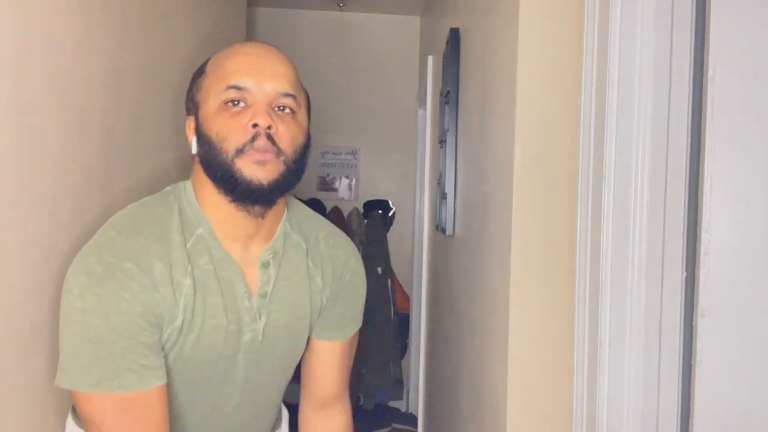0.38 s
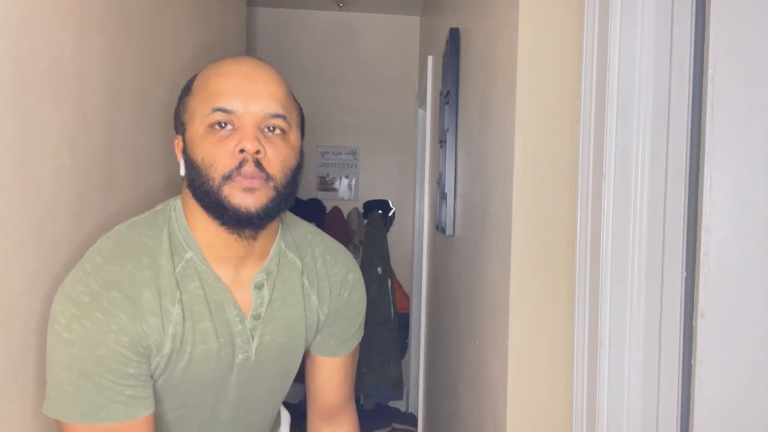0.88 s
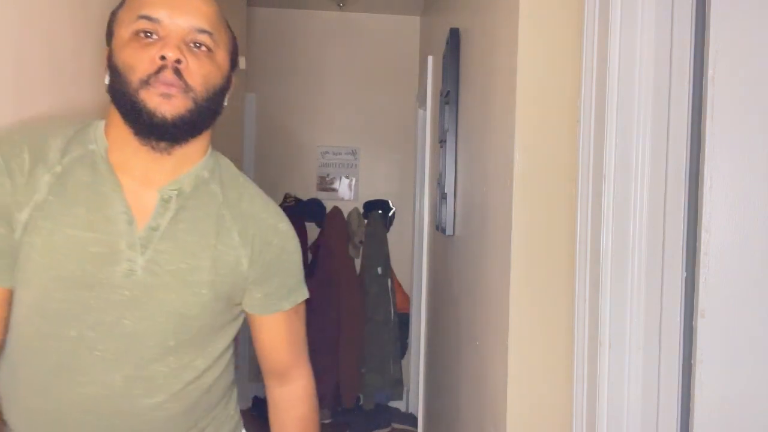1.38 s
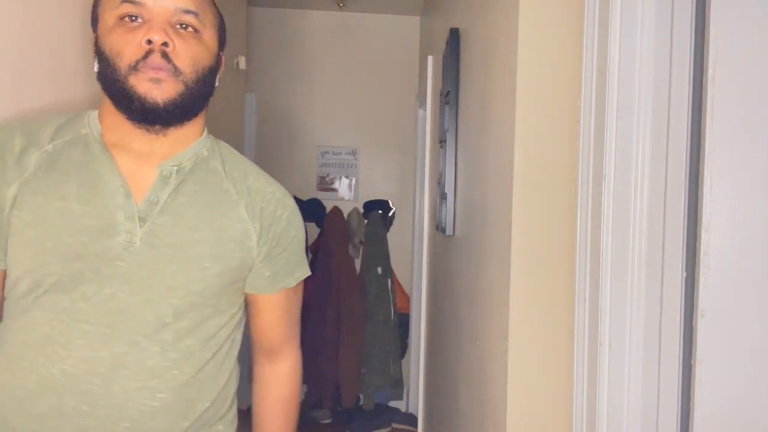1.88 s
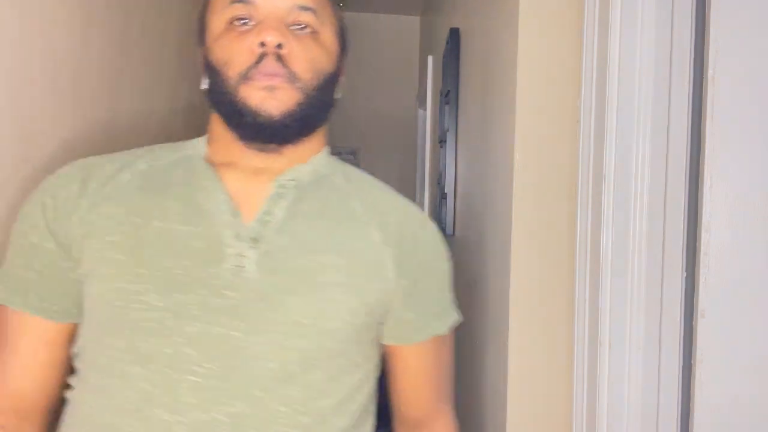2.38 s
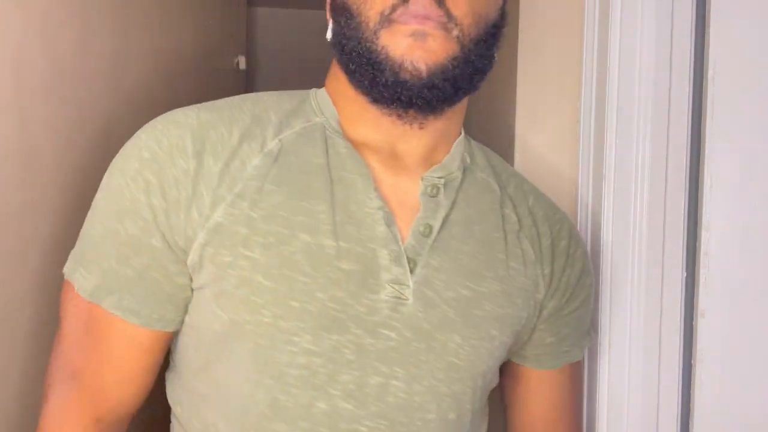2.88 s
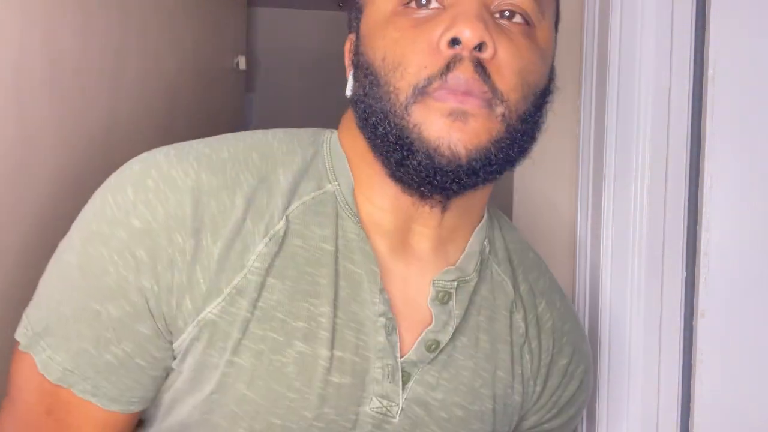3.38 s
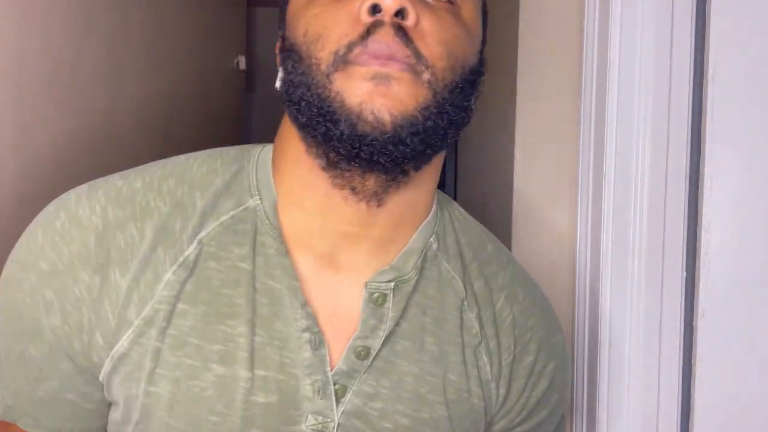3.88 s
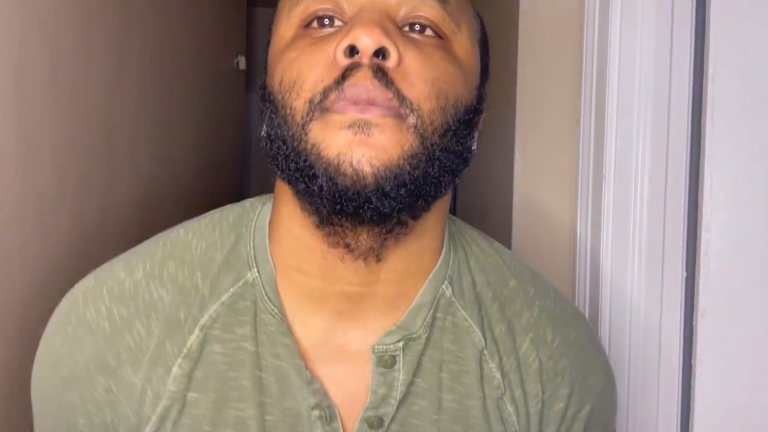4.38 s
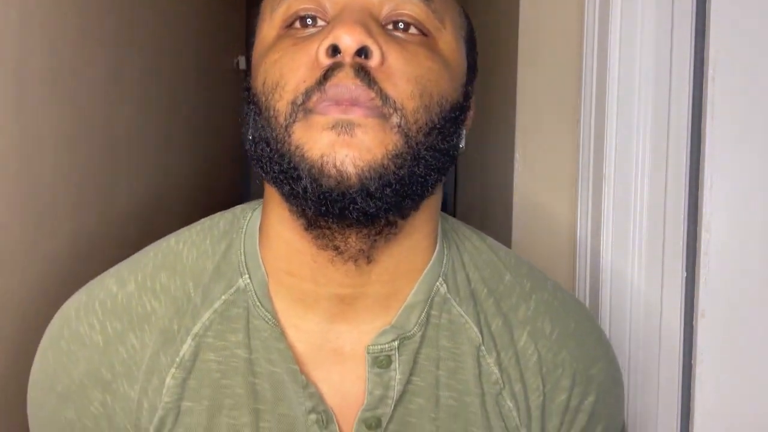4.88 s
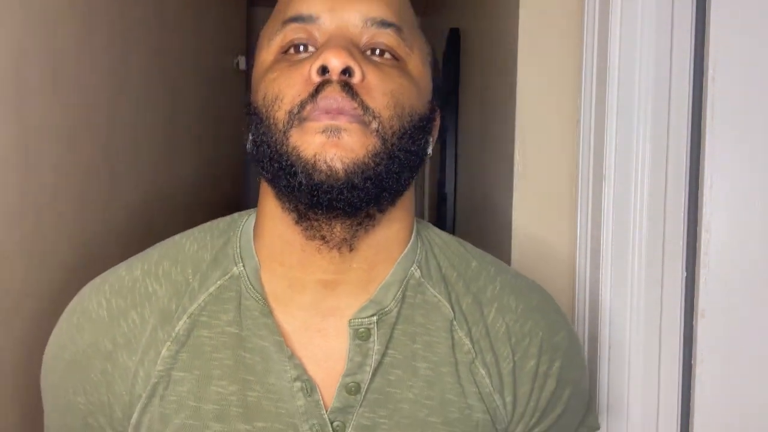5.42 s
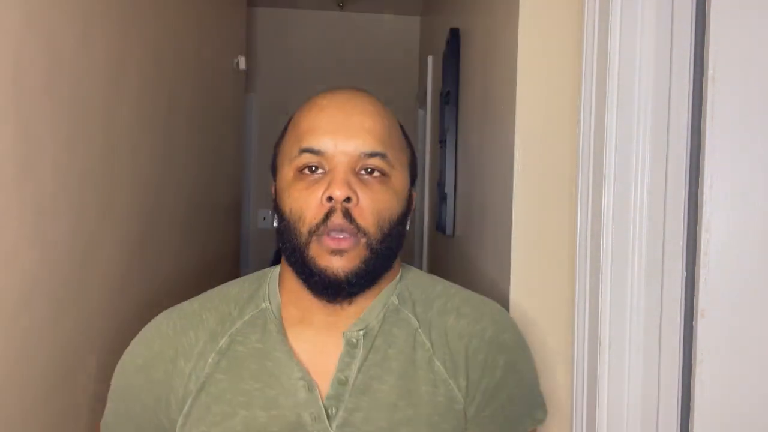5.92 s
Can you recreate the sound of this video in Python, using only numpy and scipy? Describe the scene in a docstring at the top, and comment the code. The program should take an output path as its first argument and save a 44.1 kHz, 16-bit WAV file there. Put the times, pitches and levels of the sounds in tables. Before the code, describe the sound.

A heavy box thumps and rocks down close by, then scattered footfalls, sole drags and clothing rustle on hollow boards in a quiet narrow hallway.

```python
"""A narrow hallway: someone shuffles and shifts things close to a phone with two microphone ports.
A heavy box is set down, then steps and knocks hit the boards: noise bursts, a hall answer and damped modes.
Small taps are noise clicks and notes through one resonance each; soles drag as rumble and rasp noise,
which also swells shortly into one blow.
Cloth is shaped noise, with one gliding whistle as it zips; the house is air noise, low rumble and hum."""
import sys
import numpy as np
from scipy import signal
from scipy.fft import rfft, irfft, next_fast_len
from scipy.io import wavfile
from scipy.ndimage import uniform_filter1d, map_coordinates

SR = 44100
rng = np.random.default_rng(int(sys.argv[2]) if len(sys.argv) > 2 else 0)


def store_pcm(level_fs):
    """Save levels as 16-bit WAV."""
    pcm = np.round(np.clip(level_fs, -1, 1) * 32767).astype(np.int16)
    wavfile.write(sys.argv[1], SR, np.atleast_2d(pcm).T)


def volts(x):
    """Linear amplitude factor 10**(x/20) for a level x in dB, scalar or array-like."""
    e = np.asarray(x, float) / 20
    return 10 ** e


N = 265913  # samples


def unit(x):
    """Bring to rms 1."""
    return x / np.sqrt(np.mean(x ** 2) + 1e-20)


def along(points, hz):
    """Read a curve of (f/Hz, value) points on a log frequency axis."""
    f, value = np.transpose(points)
    return np.interp(np.log(hz + 1), np.log(f + 1), value)


def wobble(rate):
    """A smooth random curve, rate knots a second."""
    knots = rng.standard_normal(int(N * rate / SR) + 4)
    return map_coordinates(knots, [np.arange(N) * rate / SR])


def filtered(x, response):
    """Filter x by a complex response of frequency."""
    m = next_fast_len(x.shape[-1] + 8192)
    hz = np.fft.rfftfreq(m, 1 / SR)
    return irfft(rfft(x, m) * response(hz), m)[..., :x.shape[-1]]


def rush(spectrum, grainy_db, rate, patchy_db=0):
    """Two unrelated coloured noises of joint rms 1, uneven in level, with brief narrow patches of colour."""
    grainy = volts(grainy_db * wobble(rate)) * rng.standard_normal((2, N))
    z = signal.stft(grainy, nperseg=1024)[2]
    field = uniform_filter1d(rng.standard_normal(z.shape[1:]), size=2, axis=0)
    field = uniform_filter1d(field, size=4, axis=1)
    pair = signal.istft(z * volts(patchy_db * unit(field)), nperseg=1024)[1][:, :N]
    return unit(filtered(pair, lambda hz: volts(along(spectrum, hz))))


def strokes(rows, extra_db=0):
    """Gain of strokes that climb to a rounded top and fall away, nearly evenly in dB; powers add."""
    rounding, bend = .12, 1.2  # softness of the top; how much faster the ends die than the middle
    s, climb, fall, db = (c[:, None] for c in np.transpose(rows)[:4])
    t = np.arange(0, N + 64, 64) / SR
    far = np.where(t < s, (s - t) / climb, (t - s) / fall) * 1000  # distance from the top, in stroke times
    drop_db = 20 * (np.hypot(far, rounding) - rounding) ** bend
    power = np.sum(volts(db + extra_db - drop_db) ** 2, axis=0)
    return np.interp(np.arange(N) / SR, t, np.sqrt(power))


def held(middle_s, half_s):
    """dB of a note that holds its level and stops steeply: 20 dB down half_s from its middle."""
    return -20 * ((np.arange(N) / SR - middle_s) / half_s) ** 4


def sway():
    """Gain of the frame's rumble: a wandering rest level, and a slow swell after each thud."""
    rest_db, shake_db, full_sway_s = -55.5, -22, 0.078
    t = np.arange(0, N + 64, 64) / SR
    s, db, weight_db = (c[:, None] for c in np.transpose(BLOW_LIST)[:3])
    since = np.maximum(t - s, 0) / full_sway_s
    swell = np.sum((volts(db + weight_db + shake_db) * since * np.exp(1 - since)) ** 2, axis=0)
    rest = volts(rest_db + 1.3 * wobble(3.4))
    return np.sqrt(np.interp(np.arange(N) / SR, t, swell) + rest ** 2)


# colour of the still air: (f/Hz, relative level/dB per Hz)
AIR_COLOUR = [(15, -49), (25, -22), (54, -7.5), (90, -10), (124, -0.5), (145, -12), (216, -10.5),
              (356, -20), (737, -27), (795, -28), (10000, -65.5), (13000, -110.5), (22000, -120)]
# mains hum partials: (f/Hz, level/dB before the lift and wander)
HUM_PARTIALS = [(59.2, -57), (118.4, -57)]


def house():
    """Still air and the frame's rumble are coloured noise; the mains hum is slightly unsteady sines."""
    t = np.arange(N) / SR
    hum = sum(volts(db + 2.5 + 3 * wobble(7)) * np.sin(2 * np.pi * hz * t + 0.5 * wobble(11))
              for hz, db in HUM_PARTIALS)
    frame_colour = [(20, -19.0), (45, -7.0), (90, -13.5), (160, -22.0), (400, -81)]  # (f/Hz, dB per Hz)
    rumble = sway() * rush(frame_colour, grainy_db=-0.2, rate=12)
    air = volts(-51.5) * rush(AIR_COLOUR, grainy_db=-0.6, rate=5.82)
    return air + rumble + hum * [[1], [.2]]


def zip_whistle():
    """A ribbed seam whistles once, its pitch rising and sagging as it slides faster, then slower."""
    middle_s, half_s, level_db = 4.718, .14, -64
    fastest_s, top_hz, sag_hz, sag_s = 4.716, 10350, 5000, .135
    off_peak = (np.arange(N) / SR - fastest_s) / sag_s
    pitch = top_hz - sag_hz * (1 - np.exp(-off_peak ** 2))
    phase = 2 * np.pi * np.cumsum(pitch * (1 + .012 * wobble(200))) / SR
    tone = np.sin(phase) + np.sin(1.52 * phase)  # an equally strong, inharmonic upper partial
    return volts(level_db + held(middle_s, half_s) + 2.5 * wobble(88)) * tone * [[1], [0]]


# moves of the clothes: (top t/s, climb/ms, fall/ms, level/dB)
CLOTH_MOVES = [(0.001, 50, 198, -58), (.058, 15, 100, -45), (.095, 45, 100, -43.5), (.33, 400, 73, -58.5),
               (.91, 32, 128, -56), (1.09, 250, 63, -51), (1.23, 60, 200, -60.5), (1.46, 139, 195, -50),
               (1.8, 400, 198, -55.5), (2.05, 405, 505, -61), (2.48, 299.5, 71, -61),
               (2.78, 45, 248, -46.5), (2.94, 150, 200, -59), (3.36, 30, 300, -63), (3.59, 350, 697, -51),
               (4.08, 500, 229, -55), (4.54, 12, 300, -58), (4.65, 152, 300, -53.5),
               (4.86, 200, 250, -59.5), (5.03, 40, 150, -63), (5.27, 19, 121, -59), (5.49, 131, 105, -62.5),
               (5.59, 80, 152, -52), (5.78, 200, 115, -54.5), (5.93, 200, 297, -61)]
# colour of the rustle: (f/Hz, relative level/dB per Hz)
WEAVE_COLOUR = [(1470, 2.5), (2500, -1.5), (3420, -4.5), (3710, -4.5), (6900, -6), (10000, -3.5),
                (11500, -2), (14000, -10), (15300, -30), (16300, -43)]


def cloth():
    """Clothes rustle: finely grained noise swells with each move; the seam's whistle joins in."""
    rustle = strokes(CLOTH_MOVES) * rush(WEAVE_COLOUR, grainy_db=0.5, rate=420, patchy_db=2.5)
    return rustle + zip_whistle()


# brief singing of a sole: (middle t/s, half length/s, level/dB before flutter)
SOLE_SQUEAKS = [(4.712, .036, -55), (4.787, .018, -57)]


def squeaks():
    """A sole sings briefly on one fluttering sine."""
    squeak_hz = 1570
    gain = sum(volts(db + held(s, half)) for s, half, db in SOLE_SQUEAKS) * volts(2.5 * wobble(65))
    return gain * np.sin(2 * np.pi * squeak_hz * np.arange(N) / SR) * [[1], [.3]]


# strokes of rumble and rasp, drags of a sole save for the short noise swell around the blow at 0.574 s:
# (top t/s, climb/ms, fall/ms, rumble level/dB, rasp over rumble level/dB)
FLOOR_STROKES = [(0.053, 12, 88, -37.5, -2), (.27, 150, 179, -57.5, 0.5), (0.574, 17.5, 12, -36.5, -6),
                 (1.06, 153, 118, -48, -3), (1.21, 60, 204, -50, -6), (1.42, 120, 400, -54.5, -12),
                 (1.8, 400, 300, -61.5, -0.5), (2.32, 22, 220, -40, -1.5), (2.62, 400, 300, -53.5, -2),
                 (2.82, 60, 302, -42.5, 2.5), (2.91, 140.5, 59, -27.5, -13), (2.95, 100, 49, -48, 4),
                 (3.35, 20, 120, -48.5, -8), (3.531, 177, 114, -38.5, -5), (3.59, 150, 153, -31.5, -12),
                 (4.06, 300, 220, -45, -9.5), (4.47, 51, 40, -52, -5), (4.58, 88, 250, -51, -2),
                 (4.82, 228, 350, -36.5, -12.5), (5.04, 100, 162, -47, -19), (5.269, 65, 301, -53.5, -9.5),
                 (5.67, 108, 220, -43, -12), (5.98, 98, 300, -50, -11)]
# colour of the rumble before the boards' notes: (f/Hz, relative level/dB per Hz)
RUMBLE_COLOUR = [(59, -38.5), (100, -26.5), (160, -2), (291, -7), (667, -7.5), (1000, -20), (1300, -55),
                 (2200, -120)]
# colour of the rasp before the boards' notes: (f/Hz, relative level/dB per Hz)
RASP_COLOUR = [(600, -40.5), (1000, -1.5), (1500, -5), (2600, -8), (4000, -16), (6000, -32)]


def soles():
    """Dragging feet: boards rumble at their own notes, grit rasps unevenly; one blow gets a short swell."""
    shuffle_db = -61  # boards never quite at rest under shifting feet
    rumble_gain = np.hypot(strokes(FLOOR_STROKES), volts(shuffle_db))
    rasp_gain = strokes(FLOOR_STROKES, np.array(FLOOR_STROKES)[:, -1:])

    def board_notes(f):  # resonances 25 Hz wide
        return 1 + sum(1.3 * 1j * f * 25 / (c * c - f * f + 1j * f * 25) for c, _, _ in BOARD_MODES)

    rumble = unit(filtered(rush(RUMBLE_COLOUR, grainy_db=1.8, rate=80, patchy_db=2.5), board_notes))
    rasp = unit(filtered(rush(RASP_COLOUR, grainy_db=1.8, rate=150, patchy_db=2.5), board_notes))
    return squeaks() + rumble_gain * rumble + rasp_gain * rasp


# small taps: (t/s, relative level/dB, f/Hz, sharpness of the resonance)
TAP_LIST = [(0.0694, -17, 1680, 1.7), (1.0177, -34, 7510, 1.7), (1.182, -32.5, 6960, 0.71),
            (1.206, -40, 2050, 1.2), (1.3084, -55, 1210, 5), (2.3844, -30.5, 8025, 1.9),
            (2.4199, -39, 4340, 1.9), (2.5062, -38, 6860, 1.5), (2.6495, -38.5, 5500, .7),
            (3.1676, -40.5, 3530, 0.56), (3.3463, -47, 3510, 1.3), (3.418, -27.5, 428, 2.3),
            (3.468, -20, 346, 6), (3.4778, -27.5, 1374, 3.75), (3.5193, -29.5, 1450, 5),
            (3.62, -19, 606, 1.6), (4.5352, -43.5, 3700, 0.76), (4.5989, -34, 2124, 3.71),
            (4.727, -28.5, 392, 6.1), (4.744, -26, 467, 2.84), (4.773, -45, 900, 1.5),
            (4.828, -35, 690, 1.7), (5.259, -40, 8220, 5), (5.6106, -35.5, 4280, 3.5),
            (5.6131, -35, 2060, 3.8), (5.753, -27.5, 417, 1.4), (5.6394, -37.5, 8900, 1.5)]


def taps():
    """Small hard taps: a damped note and a click through one resonance, with a faint answer from the hall."""
    out, t = np.zeros((2, N + SR)), np.arange(SR // 4) / SR
    for s, db, hz, sharp in TAP_LIST:
        t60 = 0.029 * 0.85 ** np.log2(hz / 1000)  # s; higher taps die sooner
        dying = volts(-60 * t / max(t60, .003))
        hall_tail = volts(-7.5 - 60 * t / 0.24)
        click = rng.standard_normal((2, len(t))) * (dying + hall_tail)
        width = hz / max(sharp, .2)

        def resonance(f):
            peak = 1j * f * width / (hz * hz - f * f + 1j * f * width)
            return peak / np.sqrt(width / (SR / 2)) / (1 + 1j * f / (2.2 * hz)) ** 2

        rung = filtered(click, resonance)
        pure = np.clip(sharp / 6, 0, .9) / (1 + (hz / 4000) ** 2)  # sharp, low resonances give a clear note
        onset = 1 - np.exp(-t * hz / 0.53)
        note = 3 * np.sin(2 * np.pi * hz * t) * dying ** .5 * onset * [[1], [.3]]
        out[:, round(s * SR):][:, :len(t)] += volts(db - 9.5) * (pure * note + (1 - pure) * rung)
    return out[:, :N]


# bands of a blow, in order thud, body, knock, clack, crack: (centre f/Hz, width/Hz)
BLOW_BANDS = [(110, 150), (350, 400), (950, 800), (2200, 1500), (6500, 6000)]
# colour shared by all blows: (f/Hz, level/dB)
BLOW_TONE = [(25, -27.5), (60, -5), (120, 10), (3500, 4.5), (9000, 5), (13000, 1.5), (15000, -13),
             (16200, -44.5)]


def blow_colour(db, thud_db, crack_db):
    """Gain over frequency of one blow: heavy blows lift the thud, hard ones the clack and crack."""
    body_db = -2 + .05 * thud_db - 0.043 * crack_db  # heavier and softer blows are fuller
    body_db += 2.6 * max(thud_db - 1.5, 0)  # a heavy heel lands flat and fills the body note
    clack_db = 2 + 0.47 * crack_db
    centre, width = np.transpose(BLOW_BANDS)
    bands_db = db + np.array([thud_db, body_db, 0, clack_db, crack_db])
    per_hz = bands_db - 10 * np.log10(width / (SR / 2))
    points = list(zip(centre, per_hz))
    return lambda hz: volts(along(points, hz) + along(BLOW_TONE, hz))


# decay of the hall: (f/Hz, t60/s before the blow's ring factor)
HALL_DECAY = [(60, 0.66), (250, 0.34), (1000, 0.37), (3000, 0.41), (10000, 0.47)]


def hall_answer(t, colour, contact, lasts):
    """The hall's dying answer: noise whose low notes take a few cycles to build up."""
    hz, frames, z = signal.stft(rng.standard_normal((2, len(t))), SR, nperseg=256)
    swell = 1 - np.exp(-(frames + 0.0059) * (hz[:, None] + 60) / 0.63)
    fade = volts(-60 * frames / (lasts * along(HALL_DECAY, hz)[:, None]))
    answer = signal.istft(z * swell * fade * colour(hz)[:, None], SR, nperseg=256)[1][:, :len(t)]
    return answer * (1 - np.exp(-t / 0.0013)) * contact


# modes of the box: (f/Hz, level/dB over the blow's colour before random spread, t60/s before ring factor)
BOX_MODES = [(63.6, -31.5, 0.86), (142.6, -32, 0.29), (217, -25.5, 0.21), (326.5, -32.5, 0.28),
             (428, -37.5, 0.31), (532, -27.5, 0.13), (651, -32, 0.37), (1014, -25.5, 0.22),
             (1210, -37.5, 0.15), (1556, -23, 0.23), (1614, -25.5, 0.033), (1890, -25, 0.25),
             (1994, -20.5, 0.13), (2202, -22.5, 0.16)]
# modes of the hollow floor boards: the same columns (f/Hz, level/dB, t60/s)
BOARD_MODES = [(71.6, -28.5, 0.61), (136.3, -25, 0.25), (266.3, -33, 0.34), (324.4, -29.5, 0.14),
               (407.7, -33, 0.39), (503.6, -27, 0.063), (646, -46.5, 0.36), (754, -27, 0.094),
               (877, -59, 0.2), (987, -27, 0.056), (1066, -47, 0.018), (1210, -40, 0.11), (1498, -40, .12),
               (2135, -25, 0.03), (2514, -59, .1), (4540, -28, 0.21)]


def ring(t, modes, colour, lasts):
    """What was struck rings on: damped sines, each with a little luck in level, pitch and side."""
    out = 0
    for (f, level, t60), (a, b, c) in zip(modes, rng.standard_normal((len(modes), 3))):
        gain = colour(f) * volts(level + 2.2 * a - 60 * t / (t60 * lasts))
        onset = 1 - np.exp(-t * f / 1.3)
        sine = np.sin(2 * np.pi * f * (1 + 0.0094 * b) * t)
        out = out + gain * onset * sine * np.array([[1], [.5 * c]])
    return out


# blows: (t/s, knock level/dB, weight as thud over knock/dB, hardness as crack over knock/dB, ring factor)
BLOW_LIST = [(0.071, -32, 1.5, -7, 1), (0.574, -13, -2.5, -23.5, 1.04), (0.586, -11.5, -7.5, -29.5, 0.76),
             (0.609, -23, -22, -44, 0.56), (0.639, -17, -13, -39, 1.03), (0.659, -24, 1.5, -46, 0.56),
             (0.731, -7, -9, -26.5, 0.77), (0.764, -16, -8, -33, 0.29), (0.802, -27, -10, -33, 1.67),
             (1.019, -41.5, -12, -5, 1.46), (2.219, -32, 2, -4.5, 2.33), (2.279, -16, 1, -12.5, 0.69),
             (2.7396, -23, -16, -18.5, 1.36), (2.751, -23, -19, -29, 1.03), (2.926, -17, -14, -20.5, 1.51),
             (2.933, -16, -20, -19, 0.63), (2.984, -10, 0.5, -31.5, 1.0), (3.6, -42, -7.5, -38, 0.43),
             (3.619, -25, 1, -52, 0.35), (3.639, -29, 4, -39, 0.75), (3.948, -28.5, 7, -43.5, 0.82),
             (4.474, -39.5, -11.5, -16.5, 1.25), (4.575, -45.5, -19, -15, 0.87),
             (5.006, -48, -13, -15, 2.3), (5.524, -43, -17.5, -6.5, 2.45), (5.753, -40, -8, -12.5, 0.56)]


def blows():
    """Each blow is a sharp burst, the hall's answer and the ring of what was struck, in one colour."""
    box_until = 1.1  # s; first a heavy box is set down and rocks, later blows fall on the floor boards
    out, t = np.zeros((2, N + SR)), np.arange(SR // 2) / SR
    for s, db, thud_db, crack_db, lasts in BLOW_LIST:
        lasts = max(lasts, .05)
        colour = blow_colour(db, thud_db, crack_db)
        contact = 1 - np.exp(-t / (.00015 * volts(-.4 * crack_db)))  # a dull blow has a longer, softer contact
        answer = hall_answer(t, colour, contact, lasts)
        noise = rng.standard_normal((2, len(t)))
        burst = filtered(noise, lambda f: colour(f) * f / (f + 900)) * volts(-60 * t / 0.11) * contact
        modes = BOX_MODES if s < box_until else BOARD_MODES
        blow = volts(-13) * answer + volts(-6) * burst + ring(t, modes, colour, lasts)
        out[:, round(s * SR):][:, :len(t)] += blow
    return out[:, :N]


# level between left and right: (f/Hz, left minus right level/dB)
STEREO_TILT = [(60, 1), (240, -0.5), (950, 0.0), (3770, -1.0), (15000, -0.5)]
# phase between left and right in the treble: (f/Hz, phase of left minus right/turns)
STEREO_PHASE = [(7200, 0), (10700, .45), (11300, .5), (12200, .5), (12800, .6), (14100, .8), (15000, 1)]


def stereo(pair, alike):
    """Left and right share much of the bass, less of the middles, and a treble turned in phase."""
    def turn(hz):  # mid/side angle that gives the wanted likeness
        return np.arccos(np.clip(along(alike, hz), -1, 1)) / 2

    mid, side = filtered(pair, lambda hz: [np.cos(turn(hz)), np.sin(turn(hz))])
    half = np.array([[.5], [-.5]])  # each side takes half the difference

    def offset(hz):
        turns = np.interp(hz, *np.transpose(STEREO_PHASE))
        return volts(half * along(STEREO_TILT, hz)) * np.exp(half * 2j * np.pi * turns)

    return filtered(np.array([mid + side, mid - side]), offset)


# likeness of left and right for close sources: (f/Hz, likeness from 0 to 1)
NEAR_LIKENESS = [(60, 0.85), (130, 0.98), (300, 0.57), (700, 0.1), (2000, 0.058), (5600, 0.1), (6600, 0.14),
                 (7200, 1)]
# likeness of left and right for sources that fill the hall: (f/Hz, likeness from 0 to 1)
FAR_LIKENESS = [(60, 0.95), (130, 0.87), (300, 0.55), (700, 0.062), (2000, 0.037), (5600, 0.029),
                (6600, 0.83), (7200, 1)]


def scene():
    """Blows and taps come from close by, the rest fills the hall."""
    far = stereo(house() + cloth() + soles(), FAR_LIKENESS)
    near = stereo(taps() + blows(), NEAR_LIKENESS)
    return far + near


def band_limit(x):
    """A steep low-pass at the top of the band."""
    return signal.sosfilt(signal.butter(12, 16520, fs=SR, output="sos"), x)


def record(dry):
    """The phone cuts the deepest bass below about 28 Hz and the top treble above 15.9 kHz."""
    def phone(hz):
        return (1j * hz / (1j * hz + 28)) ** 2 / (1 + (hz / 15900) ** 40)

    mix = filtered(dry, phone)
    return band_limit(mix)


dry = scene()
out = record(dry)
store_pcm(out)
```